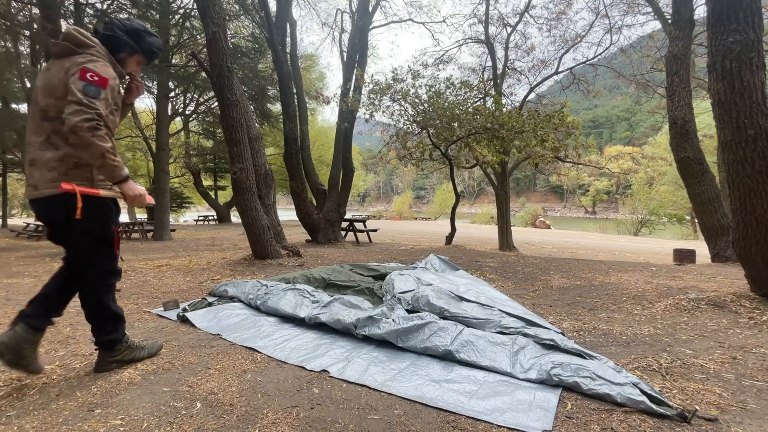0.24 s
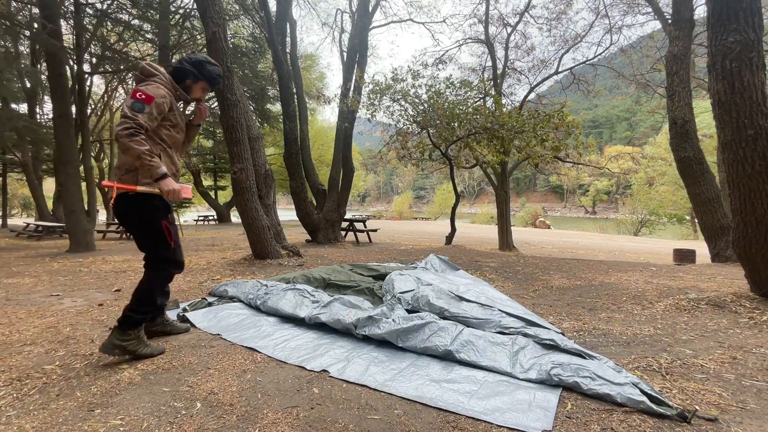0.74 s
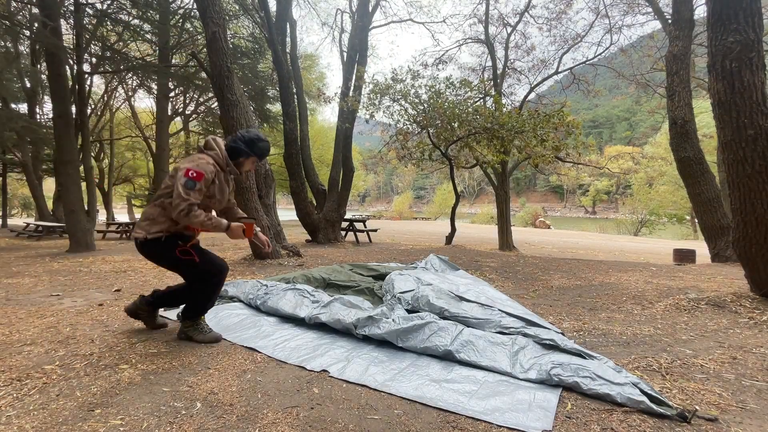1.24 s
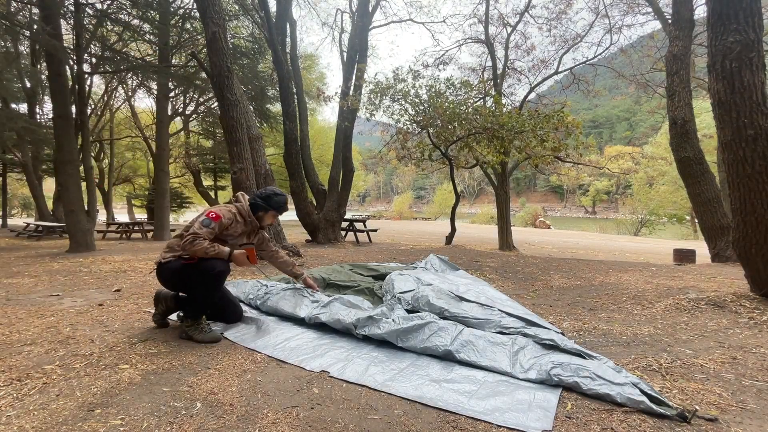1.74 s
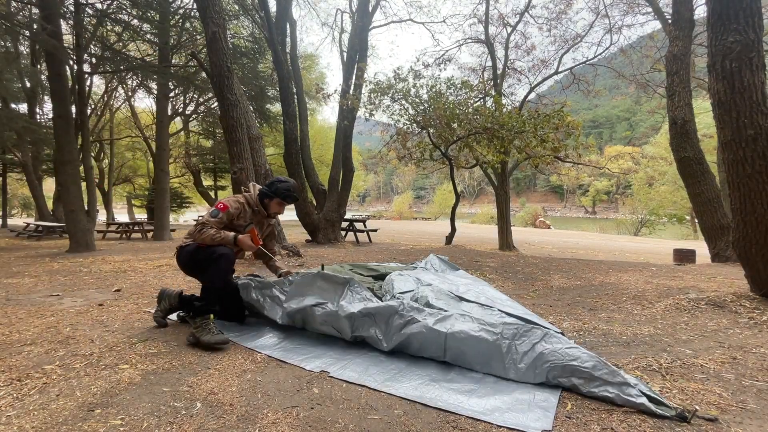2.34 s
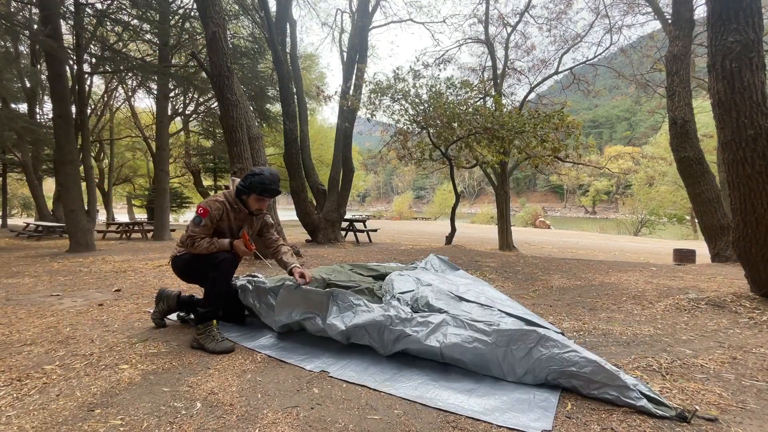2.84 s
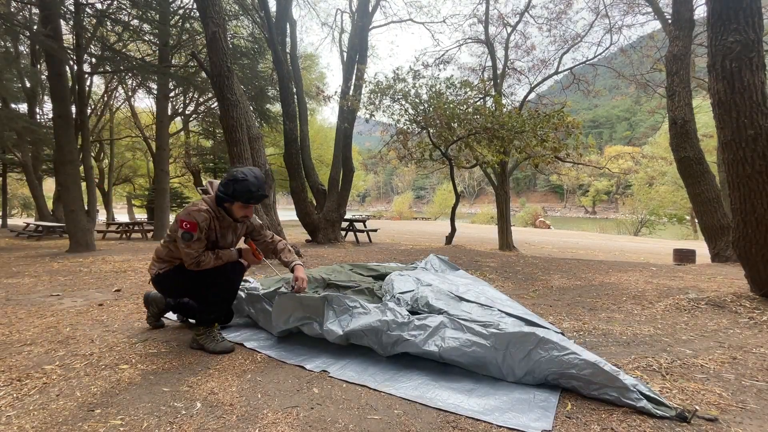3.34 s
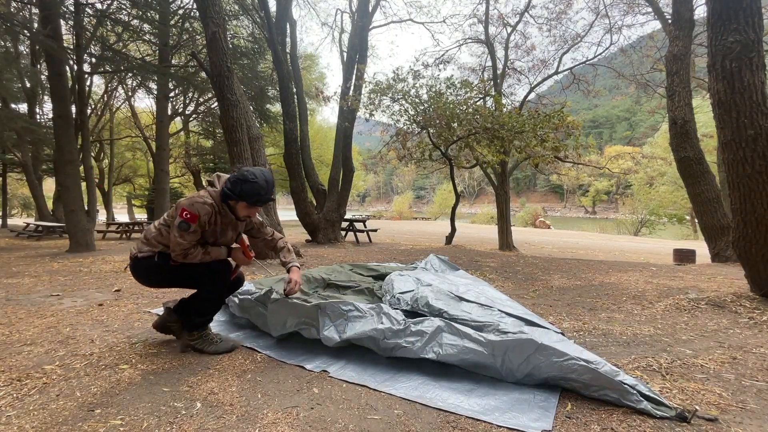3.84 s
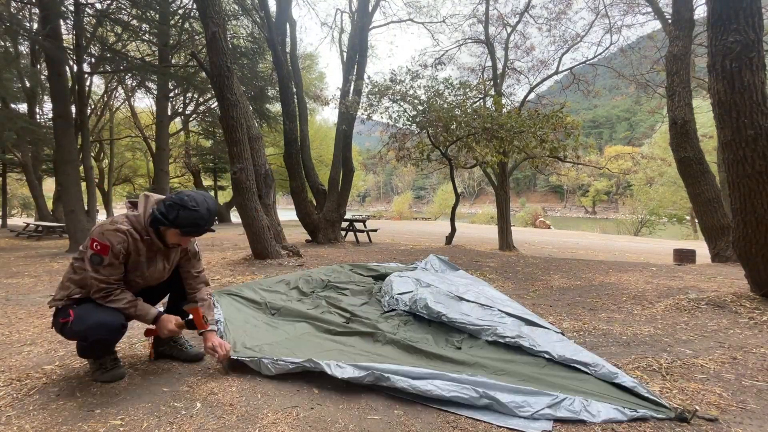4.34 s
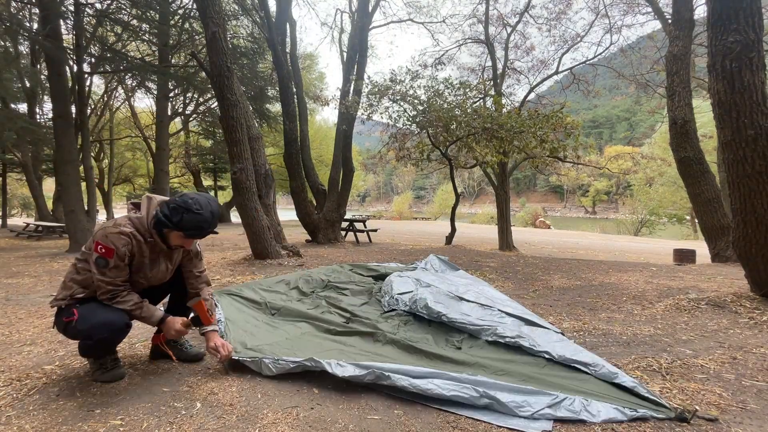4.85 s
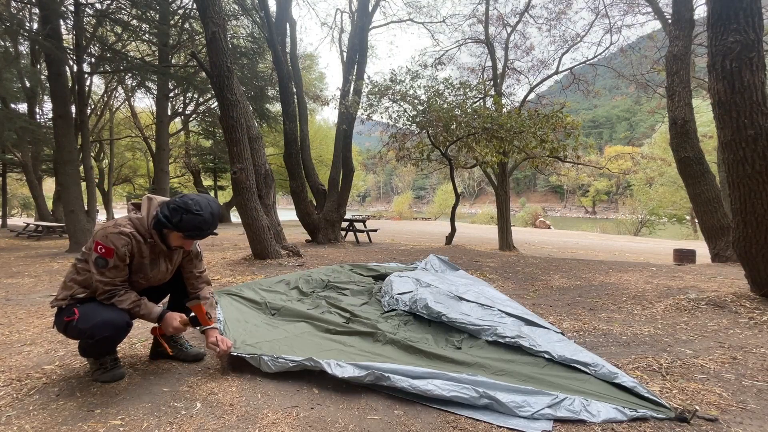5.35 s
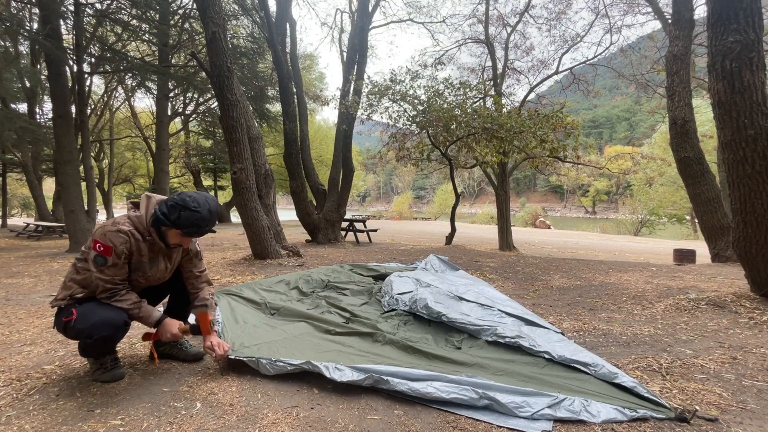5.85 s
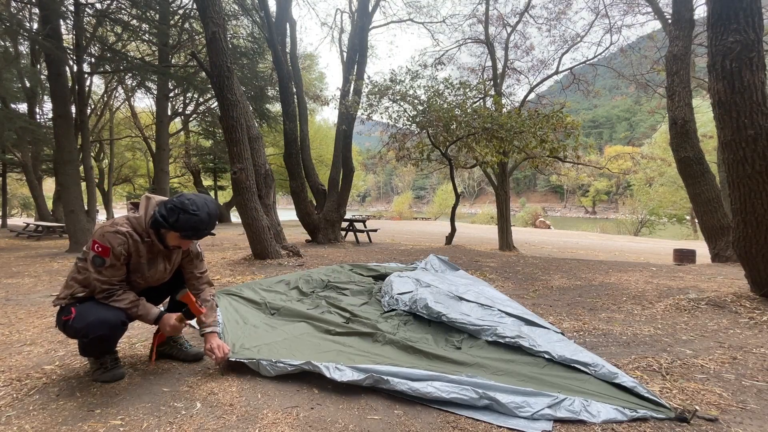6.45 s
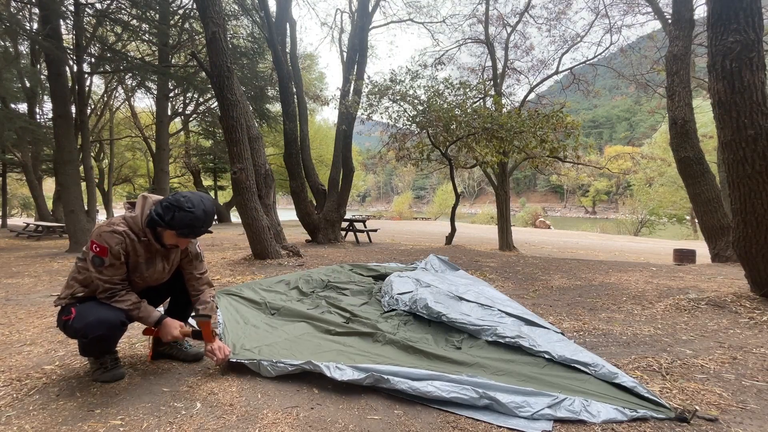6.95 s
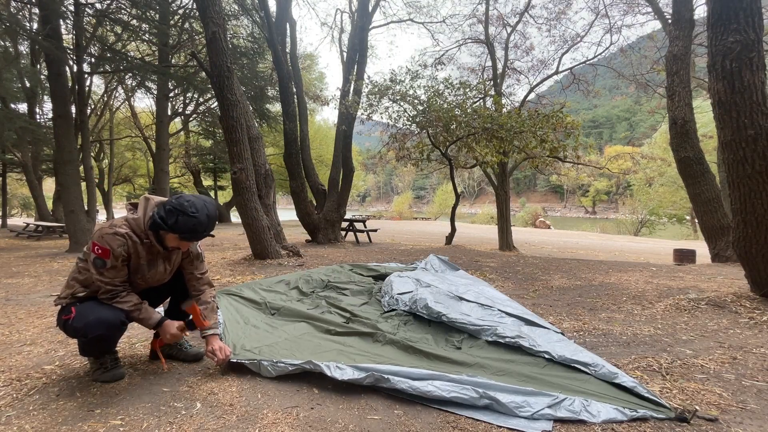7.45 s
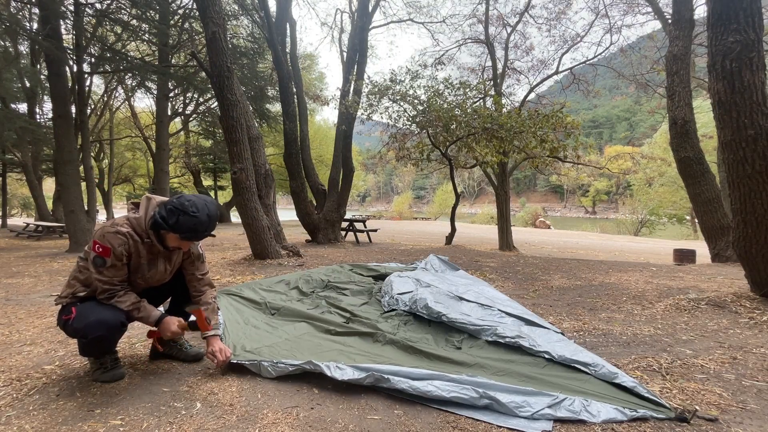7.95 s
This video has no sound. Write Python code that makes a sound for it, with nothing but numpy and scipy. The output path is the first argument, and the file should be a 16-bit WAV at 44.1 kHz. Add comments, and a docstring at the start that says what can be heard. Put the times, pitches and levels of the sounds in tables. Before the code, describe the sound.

Wind rumbles on a stereo outdoor microphone over a faint wash of leaves. Someone crouches with damped thumps and a jacket swish, dragging a coated sheet that crackles, snaps and flaps loudest around two seconds. The handling thins out, then a hammer hits a metal stake with loud, dry, bright clanks, two first and, after a gap, eight evenly spaced, each scattering off nearby trees.

```python
"""A camper walks in, crouches and drags a tent sheet over dry needles, shifting on soles and knees: crackling
creases, low flaps of cloth and short damped thumps. Then a hammer drives a steel stake into soil among trees:
each blow is a noisy clank with damped steel modes, knocks the handle, thuds in the ground and scatters back
from the trunks as decaying noise. A few thin squeaks of sliding steel fall between the blows. Throughout,
wind noise buffets the two microphone ports over a low drone and a far wash of leaves."""
import sys
import numpy as np
from scipy import signal
from scipy.fft import rfft, irfft, next_fast_len
from scipy.io import wavfile
from scipy.ndimage import uniform_filter1d, map_coordinates

SR = 44100
rng = np.random.default_rng(int(sys.argv[2]) if len(sys.argv) > 2 else 0)


def wav_record(signal):
    """Record a signal, one row per channel, as 16-bit PCM in the file named by sys.argv[1]."""
    frames = np.transpose(np.atleast_2d(signal))
    bounded = np.clip(frames, -1, 1)
    # unit amplitude maps onto the largest positive 16-bit level
    quanta = np.round(bounded * 32767).astype(np.int16)
    wavfile.write(sys.argv[1], SR, quanta)


N = 362061

# hammer blows; the first row is only the fading echo of a blow already struck: (time [s], level [dB],
# low ring [dB], middle ring [dB], top ring [dB], handle knock [dB], soil thud [dB], echo re level [dB])
BLOW_EVENTS = [(4.168, -66.5, 4, -10, -6.5, -60, -77, 21.5), (4.581, -16.5, -7.5, -9, -3, -41.5, -52, -20),
               (4.949, -16.5, -8, -15, -7, -42, -42.5, -17), (5.917, -19, -2.5, -12.5, -3, -40, -54, -18.5),
               (6.2554, -12, -7.5, -15, -6.5, -37.5, -46, -20),
               (6.593, -15, -9.5, -11.5, -6.5, -39, -41.5, -18),
               (6.9044, -15, -6, -15, -9.5, -38, -38, -16.5),
               (7.2243, -13.5, -5, -5.5, -7.5, -39, -33, -18), (7.54, -16, -5.5, -4.5, -4, -38, -34, -19),
               (7.8534, -16, -2.5, -3, -4.5, -36, -35, -17),
               (8.162, -17.5, -2.5, -1.5, -8.5, -37, -34, -17.5)]
# modes of the struck steel: (frequency [Hz], level [dB], t60 [s])
STEEL_MODES = [(2460, -9.5, 0.03), (2667, -4, 0.058), (3135, -11, 0.046), (3765, 2, 0.014),
               (3996, -2.5, 0.027), (4290, -1.5, 0.041), (4444, -9, 0.03), (5920, -5.5, 0.038),
               (6380, -12, 0.087), (7160, -4.5, 0.025), (7680, -9, 0.037), (8170, -15, 0.04),
               (10700, -24, 0.0066), (11590, -13.5, 0.033), (12300, -20.5, 0.027), (13400, -13, 0.027),
               (14000, -12, 0.043), (15600, -9.5, 0.045)]
# noise of the clank: (frequency [Hz], density [dB per Hz])
CLANK_SPECTRUM = [(710, -63), (1200, -26), (1980, -9), (2300, -6), (2590, -2), (3510, -15.5), (3870, -12.5),
                  (4450, -1), (5180, -18.5), (7020, -10), (8820, -16.5), (9510, -22), (11200, -4.5),
                  (14000, -12), (15200, -5.5), (16000, -8)]
# modes of the handle: (frequency [Hz], level [dB], t60 [s])
HANDLE_MODES = [(350, -8.5, 0.074), (457, -2, 0.065), (640, -6, 0.052), (814, 1.5, 0.031),
                (981, -3.5, 0.038), (1226, -5.5, 0.037), (1660, -5.5, .018), (2060, -16.5, 0.012)]
# modes of the soil: (frequency [Hz], level [dB], t60 [s])
SOIL_MODES = [(179, -1, 0.089), (125.2, -14, 0.47), (257, -7.5, 0.059)]
# ground and nearby returns: (delay [s], level [dB])
GROUND_RETURNS = [(.0018, -11), (.0042, -14), (.0075, -14)]
# phase by which the left port leads for the stake: (frequency [Hz], lead [rad])
STAKE_PHASE_LEAD = [(0, 0), (1800, 3.1), (3000, 5.6), (4800, 6.4), (6000, 9.4), (7500, 12.4), (8700, 14.4),
                    (10000, 13.3), (12000, 12.5), (15000, 9.4), (16000, 8.3)]
UNALIKE_DB, UNALIKE_T60_S = -5, 0.041  # part of the clank that reaches each port by its own path


def hammer():
    """Impact excitation: noisy clank and damped steel modes, ground reflections, handle knock and soil thud."""
    near, ground = np.zeros(N + SR), np.zeros(N + SR)
    far, wide = np.zeros((2, N + SR)), np.zeros((2, N + SR))
    t, slow_t = np.arange(SR // 10) / SR, np.arange(SR // 4) / SR
    grid = np.fft.rfftfreq(len(t), 1 / SR)
    for s, db, low_db, middle_db, top_db, knock_db, thud_db, echo_db in BLOW_EVENTS:
        # tone of this blow: (frequency [Hz], level [dB])
        tone = [(2700, low_db), (4100, middle_db), (6000, 0.002), (8700, 0.00097), (10500, top_db)]
        modes = [(hz, level + along(tone, hz), t60) for hz, level, t60 in STEEL_MODES]
        steel = ring(modes, t, spread_db=1.5, attack=0.00016, detune=0.0026)

        clank_gain = amp(along(CLANK_SPECTRUM, grid) + along(tone, grid))
        rattle = unit(irfft(rfft(rng.standard_normal(len(t))) * clank_gain, len(t)))
        duller = uniform_filter1d(rattle, size=2)  # the treble dies first
        clank = amp(8.0 - 60 * t / 0.0094) * rattle + amp(-0.5 - 60 * t / 0.026) * duller
        blow = amp(db - 3.5) * (steel + (1 - np.exp(-t / 0.00032)) * clank)
        lay(near, s, blow)
        for delay, level in GROUND_RETURNS:
            lay(ground, s + delay * (1 + 0.071 * rng.normal()), amp(level) * blow)

        apart = unit(irfft(rfft(rng.standard_normal((2, len(t)))) * clank_gain, len(t)))
        lay(wide, s + 0.001, amp(db + UNALIKE_DB - 60 * t / UNALIKE_T60_S) * apart)

        handle = ring(HANDLE_MODES, t, spread_db=2.9, attack=0.00081, detune=0.049)
        lay(near, s, amp(knock_db + 5) * handle)
        soil = ring(SOIL_MODES, slow_t, spread_db=1.2, attack=0.0011, detune=.03)
        lay(near, s + 0.006, amp(thud_db + 8.5) * soil)  # the soil answers a few ms late
        lay(far, s + 0.004, amp(db + echo_db - 2.5) * trees(tone, steel))
    bounced = amp([[-1.5], [1.5]]) * ground[:N]
    direct = from_left(near[:N] + bounced, STAKE_PHASE_LEAD)
    scattered = spread(far[:, :N], [(1, 0.012)], FAR_LIKENESS)
    return direct + scattered + wide[:, :N]


# what the trunks send back: (frequency [Hz], density [dB per Hz])
SCATTER_SPECTRUM = [(880, -46.5), (1500, -7), (2190, -10), (2590, -3.5), (2830, -12), (3410, -2.5),
                    (3810, -2), (5120, -10.5), (6960, -6), (8570, -8.5), (9560, -17.5), (11400, -13),
                    (12600, -18), (13900, -10), (14800, -22), (15600, -15)]
# decay of the scatter: (frequency [Hz], t60 [s])
SCATTER_DECAY = [(300, 0.41), (2500, 0.51), (4500, 0.59), (8000, 0.45), (10500, 0.43), (14000, 0.34)]
# single trunks standing out of the scatter: (delay [s], level [dB])
TRUNK_ECHOES = [(0.018, 7.5), (0.049, 3), (.075, 2), (0.109, 6)]
RING_IN_ECHO = .5  # share of the ring's peaks and dips, in dB, that the scatter keeps


def trees(tone, steel):
    """Diffuse scattering: a noise tail coloured by the ring, with a frequency-dependent decay time."""
    hz, t, z = signal.stft(rng.standard_normal((2, SR // 2)), SR, nperseg=512)
    colour = along(SCATTER_SPECTRUM, hz) + 0.61 * along(tone, hz)
    ring_db = 10 * np.log10(uniform_filter1d(abs(rfft(steel[:512])) ** 2, size=2) + 1e-9)
    colour += RING_IN_ECHO * (ring_db - uniform_filter1d(ring_db, size=15))
    decay_db = 60 * t / along(SCATTER_DECAY, hz)[:, None]
    tail = signal.istft(z * amp(colour[:, None] - decay_db), SR, nperseg=512)[1]
    late = np.arange(tail.shape[1]) / SR
    trunk_db = sum(db * np.exp(-((late - delay) / 0.012) ** 2) for delay, db in TRUNK_ECHOES)
    return tail * (1 - np.exp(-late / 0.0013)) * amp(trunk_db)


# steel sliding on steel: (start [s], hold [s], level [dB])
GRAZE_EVENTS = [(5.25, .02, -82), (5.285, 0.013, -69), (5.485, .015, -75)]
SQUEAK_HZ, SQUEAK_WIDTH_HZ, GRAZE_EDGE_DB_PER_S = 11800, 250, 500.5


def grazes():
    """Frictional excitation: noise through one narrow resonance, a thin squeak at a high mode of the stake."""
    peak = signal.iirpeak(SQUEAK_HZ, SQUEAK_HZ / SQUEAK_WIDTH_HZ, SR)
    hiss = unit(signal.lfilter(*peak, rng.standard_normal(N)))
    level = bursts(GRAZE_EVENTS, GRAZE_EDGE_DB_PER_S, GRAZE_EDGE_DB_PER_S)[0]
    return from_left(level * hiss, STAKE_PHASE_LEAD)


# sheet and clothes rustling while handled: (time [s], low flap [dB], crinkle [dB], finest crinkle [dB])
RUSTLE_LEVELS = [(0.0, -69, -74, -71), (0.07, -64, -62.5, -66), (0.36, -69, -79, -78),
                 (0.99, -66, -74, -77), (1.11, -60, -64.5, -60.5), (1.22, -56, -65.5, -57),
                 (1.41, -65.5, -67, -68.5), (1.79, -64.5, -67, -69.5), (1.95, -47, -48, -55),
                 (2.28, -45.5, -48.5, -57), (2.46, -55, -59, -63), (2.54, -59, -64.5, -68.5),
                 (3.1, -61, -65.5, -68), (3.3, -63, -60.5, -59.5), (3.38, -61, -68.5, -72),
                 (3.58, -54.5, -59.5, -64), (3.83, -85, -61, -61.5), (4.14, -89, -61.5, -60.5),
                 (4.31, -72, -67.5, -74), (4.42, -74, -94.5, -88.5), (5.3, -67.5, -90, -89),
                 (5.44, -71, -78, -98), (5.48, -67, -66.5, -75), (5.85, -79, -90, -90)]
# short pulls at the cloth: (start [s], hold [s], low flap [dB], crinkle [dB], finest crinkle [dB])
TUG_EVENTS = [(1.07, 0.014, -67, -80, -79), (1.515, 0.057, -46, -47.5, -51.5),
              (1.835, 0.012, -51, -58.5, -53), (2.03, 0.018, -55, -49.5, -52), (2.22, .02, -63, -63, -51),
              (2.635, 0.01, -53.5, -61.5, -75), (2.73, 0.033, -55, -67, -72),
              (3.655, 0.0067, -64, -73, -63), (3.7, 0.094, -52, -72, -80), (4.175, .01, -62.5, -69, -72),
              (4.51, 0.06, -82, -71.5, -72)]
TUG_RISE_DB_PER_S, TUG_FALL_DB_PER_S = 503, 300.5
# broad folds, then creases: (frequency [Hz], density [dB per Hz])
FLAP_SPECTRUM = [(71, -34.5), (120, -23), (151, -3), (319, -2.5), (1430, -7), (2010, -10), (2500, -19),
                 (3250, -46), (5500, -120)]
CRINKLE_SPECTRUM = [(880, -6), (1500, -8.5), (2000, -8), (2440, -5), (3620, -5.5), (4920, -6), (5490, -10),
                    (6690, -4), (7760, -4), (8920, -16.5), (11700, -11), (15200, -20.5), (16000, -8.5)]
# jacket rubbing in the crouch: (start [s], hold [s], level [dB])
SWISH_EVENTS = [(1.21, 0.057, -51)]
SWISH_RISE_DB_PER_S, SWISH_FALL_DB_PER_S = 125, 122
# resonances of the rub, whose sum is applied twice: (frequency [Hz], width [Hz], level per pass [dB])
RUB_BANDS = [(4200, 1200, -3.5), (5660, 1400, -11.5), (7640, 1700, -8)]
# phase by which the left port leads for the sheet: (frequency [Hz], lead [rad])
SHEET_PHASE_LEAD = [(0, 0), (1000, 2.2), (3200, 3.3), (5000, 5.4), (7000, 6.2), (16000, 6.3)]


def rub_response(f):
    """Resonant filtering: the squared sum of a few second-order band-passes."""
    return sum(amp(db) * 1j * f * w / (c * c - f * f + 1j * f * w) for c, w, db in RUB_BANDS) ** 2


def cloth():
    """Crackling noise of buckling creases over a patchy rush, with low flapping folds; part arrives scattered."""
    tugs = bursts(TUG_EVENTS, TUG_RISE_DB_PER_S, TUG_FALL_DB_PER_S)
    flap, crinkle, finest = np.hypot(curves(RUSTLE_LEVELS), tugs)  # powers add
    clumps = amp(1.8 * wobble(45))
    billow = amp(2.5 * wobble(35))

    def crackle():
        """Superposition: crease grains over clumped patchy noise."""
        return .8 * creases() + clumps * patchy(depth_db=3.5)

    direct = from_left(coloured(crackle(), CRINKLE_SPECTRUM), SHEET_PHASE_LEAD)
    scattered = unit(spread([crackle(), clumps * rng.standard_normal(N)], CRINKLE_SPECTRUM, FAR_LIKENESS))
    bright = direct + 1.15 * scattered
    top = filtered(bright, lambda hz: 1 / (1 + (8800 / (hz + 1)) ** 16))  # high-pass near 8.8 kHz
    creasing = amp(3.0) * (crinkle * unit(bright - top) + finest * unit(top))

    folds = flap * coloured(billow * patchy(depth_db=3), FLAP_SPECTRUM)
    far_folds = amp(-1.5) * flap * billow * pair(FLAP_SPECTRUM, FAR_LIKENESS)
    swish_level = bursts(SWISH_EVENTS, SWISH_RISE_DB_PER_S, SWISH_FALL_DB_PER_S)[0]
    swish = swish_level * unit(filtered(rng.standard_normal(N), rub_response))
    return creasing + far_folds + from_left(amp(1.5) * folds + swish, SHEET_PHASE_LEAD)


# creases of the sheet snapping: (time [s], level [dB], pitch [Hz], low part relative to it [dB])
SNAP_EVENTS = [(1.098, -37, 4100, -19), (1.5122, -28, 7800, -16), (1.5328, -31, 4730, -20),
               (1.5606, -34, 7690, -10), (1.5774, -30, 4950, -15), (1.9085, -32, 6940, -19),
               (1.935, -31, 7010, -8), (1.9754, -31, 6690, -22), (1.9987, -27, 7000, -16),
               (2.0317, -32.5, 6670, -13), (2.0634, -30, 6750, -18), (2.134, -36.5, 6800, 1.5),
               (2.154, -30, 5540, -24), (2.1878, -26.5, 6100, -17), (2.235, -29.5, 4920, -21),
               (2.3362, -33.5, 7230, -12), (2.425, -37.5, 4560, -16), (2.5502, -36.5, 3970, -14),
               (2.579, -30.5, 4500, -29), (2.6404, -35, 1700, -2), (2.666, -41, 1650, -6),
               (2.7253, -53, 7110, -3), (2.7559, -46, 1200, -5), (2.781, -38, 2800, -11),
               (2.824, -30, 2500, -9), (2.873, -41, 4790, -26), (2.979, -38.5, 3030, -6),
               (3.056, -34, 6100, -10.5), (3.1008, -37.5, 11700, -32), (3.1772, -46, 2500, -4.5),
               (3.3486, -37, 2000, -11), (3.4143, -38.5, 11200, -12), (3.4506, -43, 1800, -6.5),
               (3.5786, -28.5, 6150, -17.5), (3.591, -32, 6350, -23), (3.6582, -34.5, 6550, -11),
               (3.676, -35.5, 5400, -32), (3.8038, -33, 7660, -18), (4.2542, -45, 8300, -15),
               (4.333, -33.5, 6330, -17), (5.2335, -49.5, 2530, -3), (5.3492, -49.5, 2980, -4),
               (5.455, -34, 4900, -20), (5.5353, -33.5, 4600, -21), (6.703, -40.5, 6090, -20.5),
               (7.141, -50, 2520, -5)]
POP_LOW_HZ, POP_HIGH_HZ = 300, 2140


def snaps():
    """Sudden release of single creases: short decaying noise resonant at one pitch, with a duller pop."""
    x, t = np.zeros(N), np.arange(SR // 20) / SR
    low_band = signal.butter(2, [POP_LOW_HZ, POP_HIGH_HZ], "bandpass", fs=SR)

    def dying(burst, t60):
        """Exponential decay: the enveloped burst is normalised, then scaled by the spread of its envelope."""
        decay = amp(-60 * t / t60)
        return unit(burst * decay) * np.std(decay)

    for s, db, hz, low_db in SNAP_EVENTS:
        burst = rng.standard_normal((2, len(t)))
        peak = signal.iirpeak(hz, 1.2, SR)
        pitched = signal.lfilter(*peak, signal.lfilter(*peak, burst[0]))
        pop = signal.lfilter(*low_band, burst[1])
        lay(x, s, amp(db - 8.5) * dying(pitched, t60=0.014))
        lay(x, s, amp(db + low_db + 6.5) * dying(pop, t60=0.028))
    return from_left(x, SHEET_PHASE_LEAD)


# soles and knees landing on the needles: (time [s], level [dB])
THUMP_EVENTS = [(0.651, -45.5), (1.067, -35.5), (1.083, -36.5), (1.148, -37), (2.271, -35), (3.788, -36)]
# modes of the needle bed: (frequency [Hz], level [dB], t60 [s])
BED_MODES = [(195, -14.5, 0.038), (270, 4, 0.025), (486, -3, 0.032), (720, -10, .015)]


def thumps():
    """Heavily damped resonance: each soft landing is a few low cycles that die at once."""
    x, t = np.zeros(N), np.arange(SR // 10) / SR
    for s, db in THUMP_EVENTS:
        lay(x, s, amp(db) * ring(BED_MODES, t, spread_db=2.5, attack=0.002, detune=0.061))
    return from_left(x, SHEET_PHASE_LEAD)


# wind on the ports between buffets: (time [s], level [dB])
WIND_LEVELS = [(0.0, -43.5), (0.3, -52.5), (0.95, -53), (1.45, -45), (1.75, -56), (2.0, -64), (2.5, -50),
               (2.7, -57.5), (3.6, -62), (4.1, -69), (4.25, -49.5), (4.6, -58), (5.6, -52.5), (6.25, -50),
               (6.9, -54.5), (7.5, -48.5), (8.21, -56.5)]
# single buffets: (start [s], hold [s], level [dB])
GUST_EVENTS = [(0.49, 0.062, -42), (0.645, .04, -43), (0.73, 0.0091, -45), (1.025, .01, -42.5),
               (1.155, 0.012, -29), (1.275, 0.0079, -33.5), (2.34, 0.018, -40), (3.74, 0.022, -51.5),
               (4.655, 0.009, -45), (5.0, 0.037, -43), (5.94, .01, -45.5), (6.335, 0.015, -32.5),
               (6.63, 0.14, -38.5), (6.95, 0.016, -43), (7.24, .02, -41.5), (7.47, .01, -46),
               (7.61, .01, -44), (7.9, 0.019, -39.5)]
GUST_RISE_DB_PER_S, GUST_FALL_DB_PER_S = 799.5, 251
# low drone of wind in the crowns: (time [s], level [dB])
DRONE_LEVELS = [(0.0, -65), (0.5, -60), (1.17, -64.5), (1.69, -64.5), (2.12, -53.5), (2.45, -59),
                (3.09, -68.5), (4.2, -65.5), (4.37, -58), (6.7, -63.5), (6.95, -60), (8.21, -58)]
# buffeting, drone and leaves: (frequency [Hz], density [dB per Hz])
BUFFET_SPECTRUM = [(15, -34), (25, -15), (43, -6.5), (62, 3), (184, -23.5), (250, -22.5), (320, -54.5),
                   (550, -120)]
DRONE_SPECTRUM = [(60, -23), (100, 3.5), (170, 0), (260, -9), (400, -32.5), (800, -75)]
LEAF_SPECTRUM = [(160, -27), (280, -4.5), (559, -3), (745, -3.5), (824, -4.5), (1040, -5.5), (1260, -11.5),
                 (1390, -16), (2780, -23.5), (5100, -30.5), (5840, -29), (6460, -26.5), (11500, -36),
                 (15800, -36.5)]
LEAVES_DB = -59.5


def wind():
    """Turbulent pressure, lumpy and different at each port, over a low drone and the steady wash of far leaves."""
    lumps = amp(1.4 * np.array([wobble(11), wobble(19)]))
    ports = amp([[1.5], [-1.5]]) * unit(lumps * pair(BUFFET_SPECTRUM, [(30, -.3)]))
    gusts = bursts(GUST_EVENTS, GUST_RISE_DB_PER_S, GUST_FALL_DB_PER_S)
    buffeting = np.hypot(curves(WIND_LEVELS), gusts) * ports
    drone_level = curves(DRONE_LEVELS)[0] * amp(4.4 * wobble(12) + 1.6 * wobble(3.2))
    drone = drone_level * pair(DRONE_SPECTRUM, FAR_LIKENESS)
    leaf_level = amp(LEAVES_DB + 1.88 * wobble(2.56) + 0.39 * wobble(2.2))
    return buffeting + drone + leaf_level * pair(LEAF_SPECTRUM, FAR_LIKENESS)


def ring(modes, t, spread_db, attack, detune):
    """Modal superposition: damped sines at new strengths, phases and slightly new pitches."""
    total = 0
    for (hz, db, t60), (a, b, c) in zip(modes, rng.standard_normal((len(modes), 3))):
        decay = amp(db + spread_db * a - 60 * t / t60)
        total = total + decay * np.sin(2 * np.pi * hz * (1 + detune * c) * t + b)
    return (1 - np.exp(-t / attack)) * total


def creases():
    """Shot noise: tiny creases crackle in clumps, each a short damped sine at its own pitch."""
    at = np.flatnonzero(rng.random(N) < 700 / SR * amp(5 * wobble(25)))
    draw, k = rng.random((len(at), 2)), np.arange(64)
    hz = 1500 * 9 ** draw[:, :1]
    size = amp(np.minimum(-4.5 * np.log(draw[:, 1:]), 14))  # many small, few large
    grains = size * np.sin(2 * np.pi * hz * k / SR) * np.exp(-k * hz / SR / 0.86)
    return unit(np.bincount((at[:, None] + k).ravel(), grains.ravel(), N + len(k))[:N])


def patchy(depth_db):
    """Modulated noise: its strength varies in small patches of time and frequency."""
    z = signal.stft(rng.standard_normal(N), nperseg=256)[2]
    field = uniform_filter1d(uniform_filter1d(rng.standard_normal(z.shape), 14, 0), 5, 1)
    return unit(signal.istft(z * amp(depth_db * unit(field)), nperseg=256)[1][:N])


# level difference between the ports: (frequency [Hz], left minus right [dB])
PORT_LEVEL_DIFFERENCE = [(100, 0), (900, 5), (1900, -1), (2600, 6), (4500, 4), (6500, 1), (8200, -4),
                         (11000, -1.5), (15000, 0)]


def from_left(x, lead):
    """Interaural-style cues: the left port leads in phase and differs in level, each by frequency."""
    side = np.array([[.5], [-.5]])

    def response(hz):
        """Half of each difference goes to each port."""
        phase = side * np.interp(hz, *np.transpose(lead))
        return amp(side * along(PORT_LEVEL_DIFFERENCE, hz)) * np.exp(1j * phase)

    return filtered(x, response)


# likeness of the ports for far sound: (frequency [Hz], left-right correlation [-1 to 1])
FAR_LIKENESS = [(60, 0.86), (150, 0.93), (380, 0.084), (950, -0.48), (2380, -0.15), (5980, 0.37),
                (15000, 1)]


def spread(two, spectrum, alike):
    """Partial coherence: two unrelated signals become a stereo pair with a given correlation."""
    def response(hz):
        """Mid and side shares that give the correlation."""
        turn = np.arccos(np.clip(along(alike, hz), -1, 1)) / 2
        return amp(along(spectrum, hz)) * [np.cos(turn), np.sin(turn)]

    mid, side = filtered(two, response)
    return np.array([mid + side, mid - side])


def pair(spectrum, alike):
    """Partially coherent stereo noise of rms 1."""
    return unit(spread(rng.standard_normal((2, N)), spectrum, alike))


def bursts(rows, rise_db_per_s, fall_db_per_s):
    """Energy addition: per dB column one gain curve, every row rising, holding and falling."""
    t = np.arange(N) / SR
    power = 0
    for s, hold, *db in rows:
        under_db = rise_db_per_s * np.maximum(s - t, 0) + fall_db_per_s * np.maximum(t - s - hold, 0)
        power = power + np.outer(amp(db), amp(-under_db)) ** 2
    return np.sqrt(power)


def curves(rows):
    """Level envelope: one gain curve per dB column, -120 dB outside the table."""
    s, *columns = np.transpose(rows)
    return [amp(np.interp(np.arange(N) / SR, s, c, -120, -120)) for c in columns]


def wobble(rate):
    """Slow random modulation: a smooth curve through rate random knots a second."""
    return map_coordinates(rng.standard_normal(int(N * rate / SR) + 4), [np.arange(N) * rate / SR])


def filtered(x, response):
    """Linear filtering: the spectrum of x times a complex response of frequency."""
    m = next_fast_len(N + SR // 10, True)
    return irfft(rfft(x, m) * response(np.fft.rfftfreq(m, 1 / SR)), m)[..., :N]


def coloured(x, spectrum):
    """Spectral shaping of x, normalised to rms 1."""
    return unit(filtered(x, lambda hz: amp(along(spectrum, hz))))


def along(points, hz):
    """Logarithmic frequency scale: interpolate (frequency [Hz], value) points."""
    f, v = np.transpose(points)
    return np.interp(np.log(hz + 1), np.log(f + 1), v)


def lay(track, s, sound):
    """Superposition: add a sound to a track from s seconds on."""
    at = round(s * SR)
    track[..., at:at + sound.shape[-1]] += sound


def amp(db):
    """Amplitude ratio of a level in dB."""
    return 10 ** (np.asarray(db) / 20)


def unit(x):
    """Normalisation to rms 1."""
    return x / np.sqrt(np.mean(x ** 2) + 1e-20)


def scene():
    """Superposition of all sources at the two ports."""
    return hammer() + grazes() + cloth() + snaps() + thumps() + wind()


# upper band edge of the sound: (frequency [Hz], level [dB])
TREBLE_EDGE = [(15800, 0), (16000, -20), (16700, -32)]
TOP_HZ = 16800


def record(dry):
    """Band limiting: the treble falls steeply above 15.8 kHz and stops at 16.8 kHz."""
    return filtered(dry, lambda hz: amp(along(TREBLE_EDGE, hz)) * (hz < TOP_HZ))


dry = scene()
out = record(dry)
wav_record(out)
```